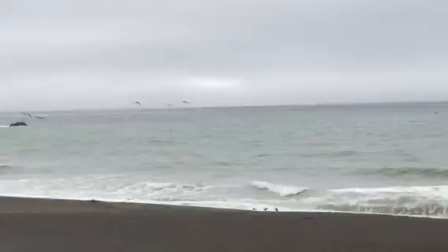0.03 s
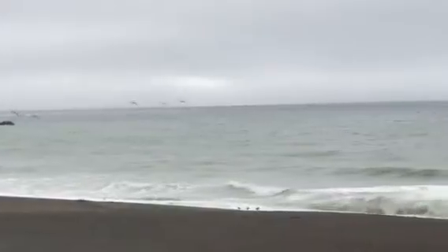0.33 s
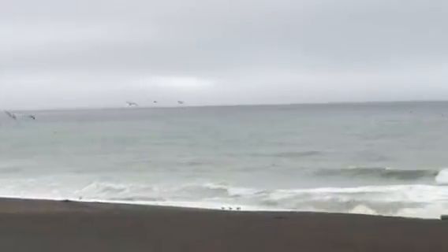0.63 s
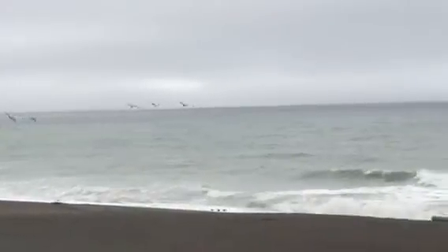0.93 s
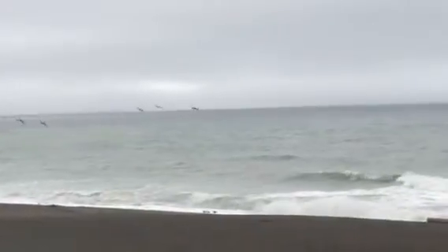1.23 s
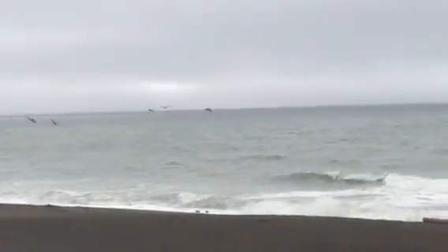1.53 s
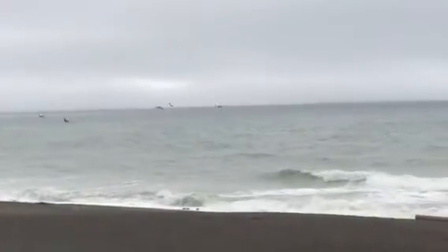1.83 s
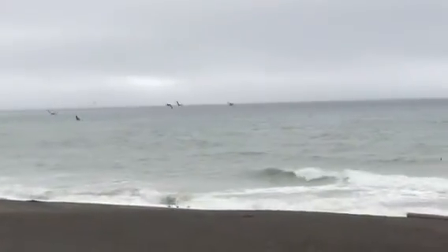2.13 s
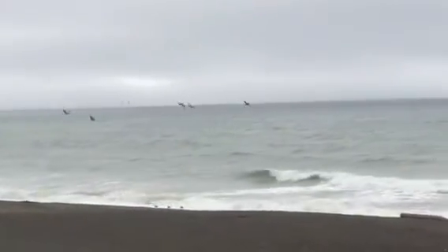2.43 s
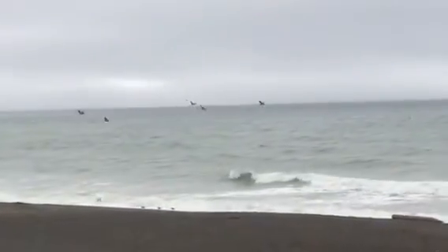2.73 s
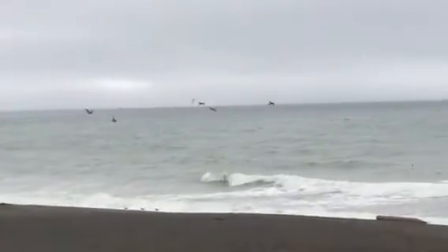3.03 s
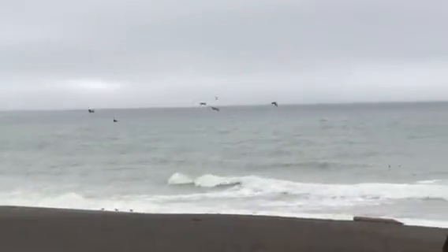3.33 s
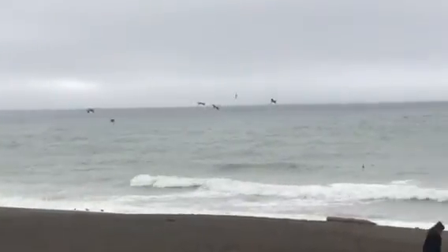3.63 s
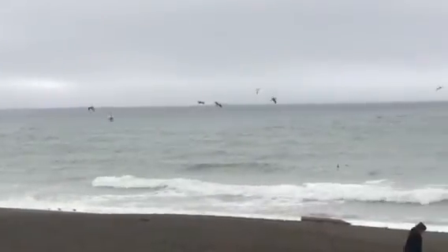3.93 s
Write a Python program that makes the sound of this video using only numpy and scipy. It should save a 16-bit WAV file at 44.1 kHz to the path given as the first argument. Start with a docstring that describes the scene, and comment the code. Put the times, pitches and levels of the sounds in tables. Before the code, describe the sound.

Waves break in a continuous rush along a sandy shore, crests splashing now and then as foam softly hisses. Gusts hit the microphone near the water, adding a lumpy rumble, a rough flutter midway and several dull thumps.

```python
"""On an open sand beach on a windy day, one microphone stands in the wind by the surf.
From the start the breakers roar steadily, foam fizzes up the sand and backwash hisses as it drains.
Gusts buffet the microphone with a lumpy rumble; a crest spills, and near 1 s an eddy lands a dull thump.
Around 2 s the hardest gust brings a rougher flutter and another thump, as more crests spill over.
Three more thumps come near 3 s, and surf and wind carry on to the end."""
import sys
import numpy as np
from scipy import signal
from scipy.fft import rfft
from scipy.io import wavfile
from scipy.ndimage import uniform_filter1d

SR = 44100
rng = np.random.default_rng(int(sys.argv[2]) if len(sys.argv) > 2 else 0)


def wav_out(sig):
    """Save sig, one row per channel (or a flat mono array), as 16-bit PCM at SR to the path in sys.argv[1]."""
    wavfile.write(sys.argv[1], SR, np.round(np.clip(np.atleast_2d(sig).T, -1, 1) * 32767).astype(np.int16))


N = 176400

# White water along the shore (time [s], relative level [dB])
WHITEWATER_LEVEL = [(.1, -46), (.3, -46.5), (1.15, -47), (1.6, -46.5), (2.3, -46.5), (2.6, -46),
                    (2.95, -47), (3.3, -46.5), (3.65, -47), (4, -46.5)]
# Its broad rush (frequency [Hz], relative level [dB])
WHITEWATER_SPECTRUM = [(20, -18), (150, 0.5), (340, -9.5), (500, -7), (850, -1), (1170, -3.5), (1550, -2),
                       (2400, -5), (3200, -10.5), (4500, -17), (6000, -22), (7200, -28), (10000, -32),
                       (15700, -45)]
# The nearest breaker, collapsing and running out (time [s], relative level [dB])
BREAKER_LEVEL = [(.1, -45.5), (.55, -45), (.95, -43), (1.45, -43), (2.05, -46), (2.4, -45), (2.9, -48),
                 (3.3, -46), (3.6, -50), (4, -47.5)]
# Its deep body (frequency [Hz], relative level [dB])
BREAKER_SPECTRUM = [(20, -21), (100, 2.5), (220, 2), (340, -2.5), (500, 1.5), (850, 1.5), (1200, -4.5),
                    (1700, -9.5), (3000, -23), (8000, -58)]
# Crests spilling over (peak time [s], level [dB], half length [s])
CREST_SPILLS = [(0.732, -50.5, 0.029), (1.787, -50.5, 0.075), (2.17, -50, .04), (2.67, -52, .07),
                (3.18, -52.5, .065), (3.846, -53.5, 0.082)]
# Their splash (frequency [Hz], relative level [dB])
CREST_SPECTRUM = [(200, -17), (700, -6), (1200, 5.5), (2100, 3), (3200, -6), (6000, -25.5), (8000, -24),
                  (15700, -50)]
# Foam running up the sand (time [s], relative level [dB])
FOAM_LEVEL = [(.1, -71), (.25, -70.5), (.65, -66.5), (1.16, -69), (1.7, -67.5), (1.95, -70.5), (2.35, -73),
              (2.6, -70), (2.9, -71.5), (3.5, -71.5), (4, -70.7)]
# Its fizz (frequency [Hz], relative level [dB])
FOAM_SPECTRUM = [(2000, -10), (5000, -2.5), (7500, -4.5), (9000, -1.5), (10000, -1.5), (11800, 0),
                 (13500, -1.5), (15700, -8.5)]
# Backwash over coarse sand (time [s], level [dB])
BACKWASH_LEVEL = [(.1, -62), (.28, -61.5), (.55, -65), (1.2, -69.5), (1.72, -64), (1.95, -69), (4, -80)]
# Hiss of the draining sand (frequency [Hz], relative level [dB])
BACKWASH_SPECTRUM = [(1500, -25), (3200, 0.5), (4200, 0.5), (6000, -4.5), (7500, -19.5), (15700, -42)]
# Gusts on the microphone (time [s], relative level [dB])
GUST_LEVEL = [(.1, -43), (.2, -35.5), (.29, -45.5), (.66, -45.5), (.75, -36.5), (.92, -32.5), (1.3, -43),
              (1.36, -36), (1.5, -36.5), (1.59, -31.5), (1.72, -40), (1.79, -29.5), (1.85, -36), (1.9, -30),
              (2.4, -34.5), (2.79, -38.5), (2.88, -32.5), (3.1, -35.5), (3.24, -41), (3.32, -33.5),
              (3.4, -56), (3.45, -34.5), (3.57, -43.5), (3.63, -33), (3.85, -46.5), (3.92, -35), (4, -41)]
# Their rumble (frequency [Hz], relative level [dB])
GUST_SPECTRUM = [(8, -40), (20, -4), (40, -1.5), (85, 1), (120, -1.5), (170, -6), (230, -11.5),
                 (320, -20.5), (600, -37), (2000, -88)]
# Small eddies at the microphone (time [s], level [dB])
FLUTTER_LEVEL = [(.1, -52), (.55, -52.5), (.7, -42.5), (.8, -50), (1.02, -41.5), (1.18, -56), (1.32, -53),
                 (1.45, -45), (1.74, -56.5), (1.79, -41.5), (1.83, -48), (1.94, -35), (1.99, -47),
                 (2.07, -38.5), (2.2, -57), (2.37, -53.5), (2.6, -55.5), (3.03, -48.5), (3.2, -57),
                 (3.29, -48), (3.39, -67), (3.52, -46), (4, -53.5)]
# Their flutter (frequency [Hz], relative level [dB])
FLUTTER_SPECTRUM = [(40, -22), (130, 1), (230, -3.5), (330, -4), (500, -9.5), (800, -20), (1500, -21),
                    (4000, -60)]
# Single eddies hitting the microphone (time [s], peak level [dB], width [s])
EDDY_HITS = [(1.037, -25.5, 0.00083), (1.947, -28, 0.0007), (2.968, -28, .0007), (3.112, -25, 0.003),
             (3.295, -30, 0.0013)]

TIME = np.arange(N) / SR
BIN_HZ = np.fft.rfftfreq(N, 1 / SR)


def amp(db):
    """Decibels to gain."""
    return 10 ** (np.asarray(db) / 20)


def unit(x):
    """Scales to an rms of 1."""
    return x / np.sqrt(np.mean(x ** 2) + 1e-20)


def level(curve):
    """Gain at every sample from (time [s], level [dB]) points."""
    return amp(np.interp(TIME, *np.transpose(curve)))


def colour(x, spectrum):
    """Shapes x by (frequency [Hz], level [dB]) points, at rms 1."""
    hz, db = np.transpose(spectrum)
    gain = amp(np.interp(np.log(BIN_HZ + 1), np.log(hz + 1), db))
    return unit(np.fft.irfft(rfft(x) * gain, N))


def wander(rate_hz):
    """Slow random motion of rms 1, up to about the given rate."""
    band = BIN_HZ / (BIN_HZ + rate_hz / 10) / np.sqrt(1 + (BIN_HZ / rate_hz) ** 6)
    return unit(np.fft.irfft(rfft(rng.standard_normal(N)) * band, N))


def patchy(depth_db, frames, bins):
    """White noise whose level drifts in patches of time and frequency."""
    spectra = signal.stft(rng.standard_normal(N), nperseg=1024, noverlap=768)[2]
    drift = uniform_filter1d(rng.standard_normal(spectra.shape), frames, axis=1)
    patches = unit(uniform_filter1d(drift, bins, axis=0))
    return signal.istft(spectra * amp(depth_db * patches), nperseg=1024, noverlap=768)[1][:N]


def turbulence(spectrum, depth_db, rate_hz):
    """Wind pressure at rms 1: noise with its slow swings evened out, then shaken into lumps."""
    pressure = colour(rng.standard_normal(N), spectrum)
    steady = pressure / np.sqrt(uniform_filter1d(pressure ** 2, 3000) + 1e-6)
    return unit(steady * amp(depth_db * wander(rate_hz)))


def whitewater(gain_db=-1.5, swell_db=-0.06):
    """Broken water all along the beach makes a bright, steady rush."""
    rush = colour(patchy(depth_db=0.5, frames=18, bins=12), WHITEWATER_SPECTRUM)
    unevenness_db = swell_db * wander(rate_hz=5.3)  # from one stretch of the wave front to the next
    return rush * level(WHITEWATER_LEVEL) * amp(gain_db + unevenness_db)


def breakers(gain_db=-3):
    """The wave nearest the microphone collapses with a deep, churning roar."""
    churn = patchy(depth_db=1.0, frames=18, bins=10)
    return colour(churn, BREAKER_SPECTRUM) * level(BREAKER_LEVEL) * amp(gain_db)


def crests():
    """Each spilling crest adds a short swell of splashing."""
    swell = sum(amp(db) * np.exp(-.5 * ((TIME - at) / half) ** 2) for at, db, half in CREST_SPILLS)
    splash = patchy(depth_db=3.0, frames=10, bins=12)
    return colour(splash, CREST_SPECTRUM) * swell


def foam(bubbles_per_s=3700, spread_db=2.8, bubble_share=.2, gain_db=2):
    """Thousands of tiny bubbles burst over a smooth hiss as the swash spreads up the sand."""
    strengths = amp(spread_db * np.minimum(rng.exponential(1, N), 5))
    signs = rng.choice([-1, 1], N)
    bursts = rng.random(N) < bubbles_per_s / SR
    pops = unit(strengths * signs * bursts)
    hiss = unit(patchy(depth_db=1.2, frames=14, bins=40))
    fizz = np.sqrt(bubble_share) * pops + np.sqrt(1 - bubble_share) * hiss
    return colour(fizz, FOAM_SPECTRUM) * level(FOAM_LEVEL) * amp(gain_db)


def backwash():
    """Water drains back through the sand with a thin hiss."""
    hiss = patchy(depth_db=1.5, frames=8, bins=14)
    return colour(hiss, BACKWASH_SPECTRUM) * level(BACKWASH_LEVEL)


def wind_rumble(gain_db=-0.3):
    """Large eddies press right on the microphone in lumps, following the gusts."""
    return turbulence(GUST_SPECTRUM, depth_db=1.48, rate_hz=37) * level(GUST_LEVEL) * amp(gain_db)


def wind_flutter():
    """Small eddies cross the microphone in quick bursts, higher in pitch than the rumble."""
    return turbulence(FLUTTER_SPECTRUM, depth_db=3, rate_hz=29) * level(FLUTTER_LEVEL)


def wind_thumps():
    """Each eddy core passing the microphone is a brief suction between two weak pushes."""
    pressure = np.zeros(N)
    for at, db, width in EDDY_HITS:
        offset_sq = ((TIME - at) / width) ** 2
        suction = (1 - offset_sq / 2) / (1 + offset_sq / 2) ** 2
        pressure -= amp(db) * suction * np.exp(-offset_sq / 20)
    return pressure


def scene():
    """Sea and wind at one microphone on the beach."""
    sea = breakers() + whitewater() + crests() + foam() + backwash()
    return (sea + wind_rumble() + wind_flutter() + wind_thumps())[None]


def record(dry, start_s=0.082, fade_s=0.0021, cutoff_hz=15680):
    """The sound opens abruptly after a moment of silence, with the highest treble cut off."""
    opened = dry * np.clip((TIME - start_s) / fade_s, 0, 1)
    lowpass = signal.firwin(1023, cutoff_hz, window=("kaiser", 9), fs=SR)
    return signal.oaconvolve(opened, lowpass[None], "same")


dry = scene()
out = record(dry)
wav_out(out)
```